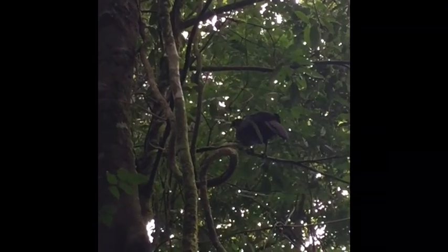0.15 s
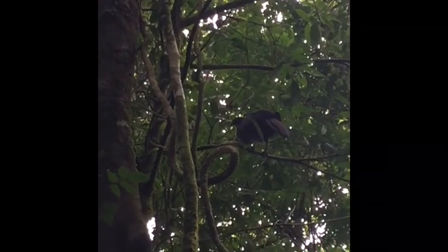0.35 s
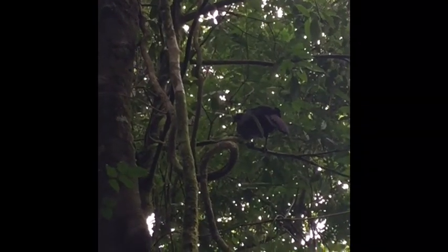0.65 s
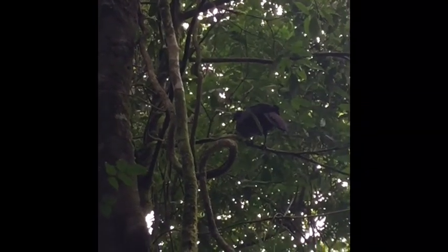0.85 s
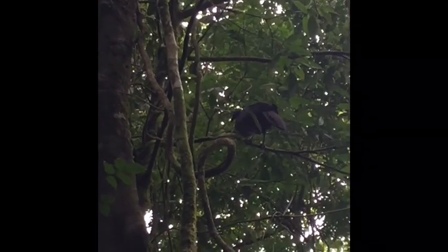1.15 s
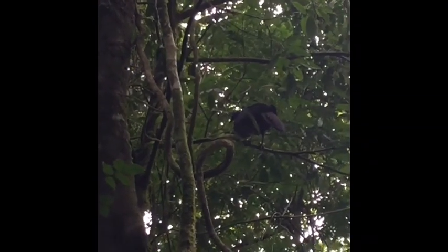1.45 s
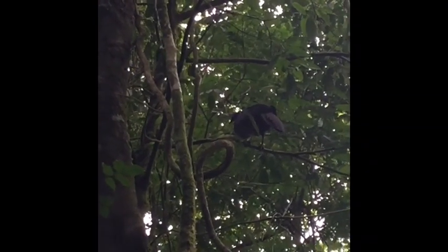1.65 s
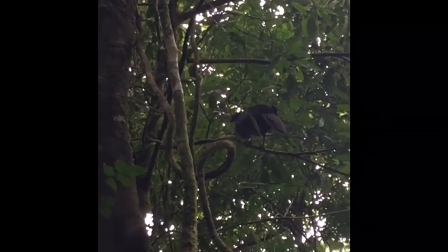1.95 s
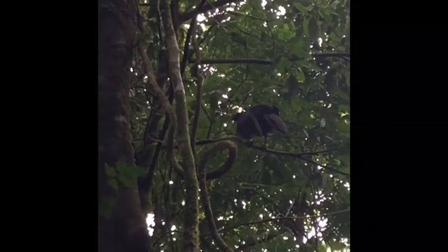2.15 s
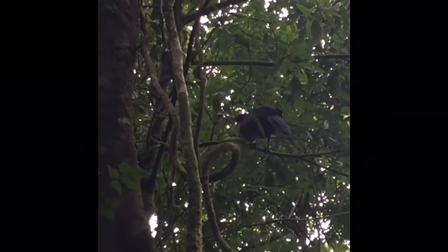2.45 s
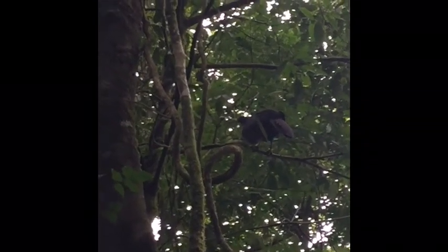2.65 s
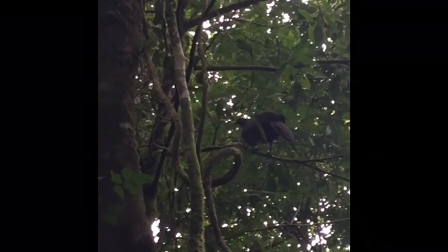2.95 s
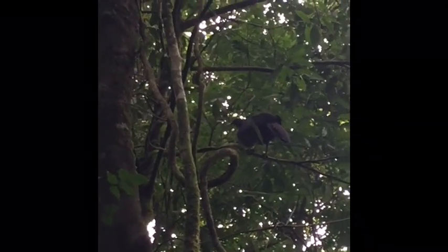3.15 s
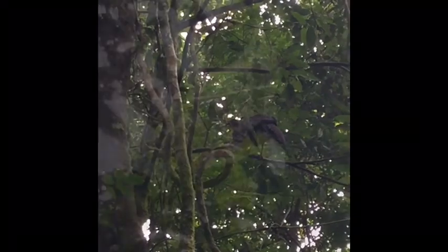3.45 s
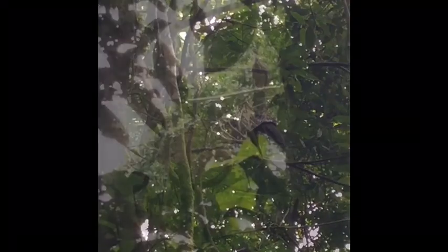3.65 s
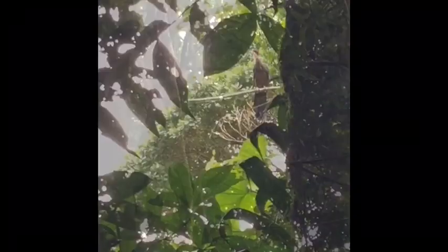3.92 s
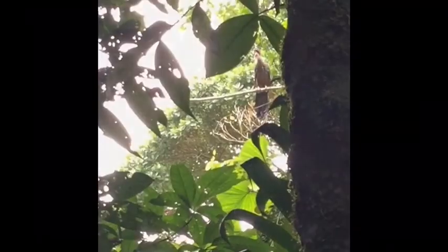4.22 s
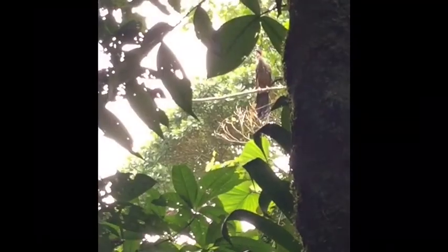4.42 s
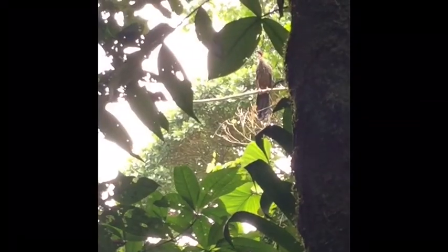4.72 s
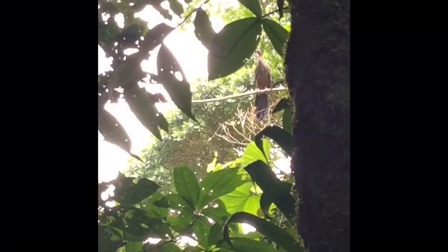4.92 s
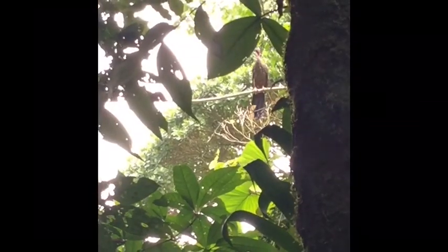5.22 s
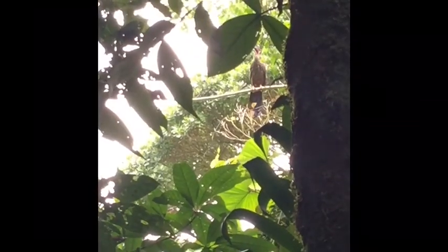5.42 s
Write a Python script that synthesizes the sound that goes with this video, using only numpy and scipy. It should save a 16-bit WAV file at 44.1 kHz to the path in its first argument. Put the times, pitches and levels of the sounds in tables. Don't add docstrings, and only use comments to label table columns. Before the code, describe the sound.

A close cicada sings over a surrounding chorus in shaded rainforest, its dry buzz tightening into a fast, even, bright rattle and sagging in three loud swells. Small leaf brushes and twig ticks sit over a low soft rumble. Near four seconds everything crossfades to a breezier place, where a farther chorus fades almost away and then returns, with a few faint bird whistles. Mono, small recorder with thin bass.

```python
import sys
import numpy as np
from scipy import signal
from scipy.fft import rfft, irfft, next_fast_len
from scipy.io import wavfile
from scipy.ndimage import uniform_filter1d

SR = 44100
rng = np.random.default_rng(int(sys.argv[2]) if len(sys.argv) > 2 else 0)


def voltage_ratio(level):
    return 10 ** (np.asarray(level, float) / 20)


def master_out(mix):
    frames = np.transpose(np.atleast_2d(mix))
    ceiling = np.clip(frames, -1, 1)
    pcm = np.round(ceiling * 32767).astype(np.int16)
    wavfile.write(sys.argv[1], SR, pcm)


N = 246059
TIME = np.arange(N) / SR

# (start [s], turns even [s], peak [dB], even rate [Hz], sag [Hz/s])
PHRASES = [
    (-1.1, -.55, -27, 133, 11),
    (.9, 1.45, -24.7, 133.5, 12),
    (2.84, 3.36, -25.6, 133.2, 9.8),
]
# (time [s], level [dB])
CHORUS = [(0, -35), (.34, -35), (.6, -36.5), (.8, -45.5), (.9, -46.5), (1.5, -38), (2.32, -35),
          (2.53, -30.5), (2.64, -36), (2.86, -38.5), (4.05, -44), (4.64, -48.5), (4.88, -58.5), (5.12, -56),
          (5.47, -41.5), (5.58, -43)]
DISSOLVE_S, CROSS_S = (3.9, 4.25), (3.42, 4.2)


def unit(x):
    return x / np.sqrt(np.mean(x ** 2))


def curves(table):
    s, *columns = np.transpose(table)
    return [np.interp(TIME, s, c) for c in columns]


def colour(x, points):
    hz, db = np.transpose(points)
    size = next_fast_len(len(x))
    log_hz = np.log(np.arange(size // 2 + 1) * SR / size + 1)
    gain = voltage_ratio(np.interp(log_hz, np.log(hz), db))
    return unit(irfft(rfft(x, size) * gain, size)[:len(x)])


def walk(rate_hz):
    k = int(SR / rate_hz)
    held = np.repeat(rng.standard_normal(N // k + 1), k)
    return 0.89 * uniform_filter1d(uniform_filter1d(held, k), k)[:N]


def trunks(x, t60_s, wet_db):
    t = TIME[:SR // 2]
    scatter = rng.standard_normal(len(t)) * voltage_ratio(-60 * t / t60_s)
    scatter *= voltage_ratio(wet_db) / np.sqrt(np.sum(scatter ** 2))
    return unit(x + signal.fftconvolve(x, scatter)[:N])


def near_singer():
    attack_s, build_db, built_db, step_s = .13, -5, -3.8, .07
    hold_s, tire_s, tired_db, stop_s, silent_db = .5, .27, -5, .12, -24
    rest_hz, rush_hz, rush_drop_s, steady_s = 128.5, 136.5, .06, .08
    even_peak, even_in_s, even_s, even_out_s, even_rest = .92, .15, .46, .2, .12
    dark_start_db, shell_build_db = -14, -5
    db, lift_db = np.full(N, -120.), np.zeros(N)
    hz, even = np.full(N, 1. * rest_hz), np.full(N, 1. * even_rest)
    for start, turn, peak_db, even_hz, sag in PHRASES:
        on = TIME >= start
        tired = turn + hold_s + tire_s
        times = (start, start + attack_s, turn - step_s, turn + step_s,
                 turn + hold_s, tired, tired + stop_s, tired + 3 * stop_s)
        shape_db = (silent_db, build_db, built_db, 0, 0, tired_db, silent_db, 3 * silent_db)
        db = np.where(on, peak_db + np.interp(TIME, times, shape_db), db)

        times = (start, start + 1.5 * attack_s, turn)
        lift_db = np.where(on, np.interp(TIME, times, (dark_start_db, shell_build_db, 0)), lift_db)

        rush = np.interp(TIME, (start, turn - rush_drop_s, turn), (rest_hz, rush_hz, even_hz))
        sagging = np.maximum(even_hz - sag * np.maximum(TIME - turn - steady_s, 0), rest_hz - 1)
        hz = np.where(on, np.where(TIME < turn, rush, sagging), hz)

        times = (turn - even_in_s, turn + .02, turn + even_s, turn + even_s + even_out_s)
        even = np.where(on, np.interp(TIME, times, (even_rest, even_peak, even_peak, even_rest)), even)
    return db, lift_db, hz, even


def bands(near_db, lift_db):
    # (time [s], level above body [dB])
    chorus_shell = [(4.15, -18), (4.7, -31), (5.45, -33), (5.58, -22)]
    near_overtone_db, near_shell_db = -24, -8
    chorus_overtone_db, far_overtone_db = -30, -24
    dull_below_db, dull_slope = -37.5, 2.4
    chorus_db = curves(CHORUS)[0]
    near = (voltage_ratio(near_db) * np.interp(TIME, CROSS_S, (1, 0))) ** 2
    chorus = voltage_ratio(chorus_db) ** 2
    far = np.interp(TIME, DISSOLVE_S, (0, 1))
    dull_db = chorus_overtone_db + dull_slope * np.minimum(chorus_db - dull_below_db, 0)
    dull_db = (1 - far) * dull_db + far * far_overtone_db

    def mix(a_db, b_db):
        return 10 * np.log10((near * voltage_ratio(2 * a_db) + chorus * voltage_ratio(2 * b_db)) / (near + chorus))

    body_db = 10 * np.log10(near + chorus)
    overtone_db = mix(near_overtone_db + .7 * lift_db, dull_db)
    return body_db, overtone_db, mix(near_shell_db + lift_db, curves(chorus_shell)[0])


def slack():
    rise_s, end_s = .05, .24
    return voltage_ratio(-15) * sum(np.interp(TIME, (s, s + rise_s, s + end_s), (0, 1, 0)) for s, *_ in PHRASES)


def singer(hz, trail, slip_s, scatter_db):
    turns = np.cumsum(hz) / SR
    cycle = np.arange(int(turns[-1]))
    left = np.interp(cycle, turns, np.arange(N))
    right = np.interp(cycle + trail[left.astype(int)], turns, np.arange(N))
    chance = rng.standard_normal((2, 2, 1000))[:, :, :len(left)]
    place = np.clip(np.array([left, right]) + slip_s * SR * chance[0], 8, N - 9).ravel()
    size = (np.array([[1], [-.5]]) * voltage_ratio(scatter_db * chance[1])).ravel()
    taps = np.floor(place)[:, None] + np.arange(-7, 9)
    off = taps - place[:, None]
    shape = np.sinc(off) * np.cos(np.pi * off / 16) ** 2
    return np.bincount(taps.astype(int).ravel(), (size[:, None] * shape).ravel(), N)


def cicadas():
    # (time [s], muscle rate [Hz], share [0-1])
    second_song = [(1.5, 123.5, 0), (1.62, 123.8, 0), (1.72, 123.6, 0.35), (1.9, 121.9, .4),
                   (2.12, 119.6, 0.42), (2.2, 119, 0.16)]
    # (time [s], share of a cycle [0-1])
    trail_course = [(0, .55), (2.4, .55), (2.7, .5), (5.58, .5)]
    # (frequency [Hz], density [dB/Hz])
    even_body = [(1240, -74), (2100, -36), (2450, -20), (2730, -33), (3130, -4), (3320, -4), (3670, 0),
                 (4040, -5.5), (4210, 0.5), (4990, -1.5), (5690, -7), (7000, -31.5), (9100, -74),
                 (15400, -120)]
    ragged_body = [(1240, -66), (2100, -38.5), (2260, -28), (2430, -26), (2970, -6.5), (3340, -6.5),
                   (3600, 0), (3960, -5), (4170, 1), (4540, 2.5), (5170, -6), (5610, -5), (5990, -11.5),
                   (6660, -25.5), (7000, -35.5), (9100, -95), (15400, -120)]
    far_body = [(1470, -39), (2500, -17), (3090, -0.5), (3320, -3.5), (3630, -0.5), (4360, 0.5),
                (5880, -10), (6500, -18.5), (8450, -52), (14300, -120)]
    slack_body = [(2100, -40), (2350, -6), (2550, 0), (2850, -4), (3300, -40)]
    # (frequency [Hz], density [dB/Hz])
    overtone_ring = [(6400, -25), (7300, -7), (8200, -1.5), (9400, -3), (10500, -9), (11300, -13),
                     (13000, -23)]
    # (frequency [Hz], density [dB/Hz])
    hard_shell = [(6470, -69), (11000, -50), (11700, -12), (12200, -2), (13200, 3), (13700, 3.5),
                  (14300, 7.5), (15700, 0.5)]
    soft_shell = [(6470, -51), (11000, -29), (12500, 4.5), (13200, 4), (14100, 6.5), (15700, -4)]

    near_db, lift_db, lead_hz, even = near_singer()
    body_db, overtone_db, shell_db = bands(near_db, lift_db)
    second_hz, share = curves(second_song)
    trail = curves(trail_course)[0] + 0.0046 * walk(5.99)
    even, share = np.clip(even, 0, 1), np.clip(share, 0, 1)
    rest = np.sqrt(np.clip(1 - even ** 2 - share ** 2, 0, 1))

    lead = trunks(singer(lead_hz, trail, 9e-6, 0.8), 0.18, 10.0)
    second = trunks(singer(second_hz, trail, 9e-6, 1.28), 0.11, 7.0)
    ragged = sum(singer(pace * lead_hz, trail, 0.000199, 2.4) for pace in (1, 1.003, .94, .91, 1.05))
    ragged = trunks(ragged, 0.3, 6.2)

    far = np.interp(TIME, DISSOLVE_S, (0, 1))
    buzz = np.sqrt(1 - far) * colour(ragged, ragged_body) + np.sqrt(far) * colour(ragged[::-1], far_body)
    body = even * colour(lead, even_body) + share * colour(second, even_body) + rest * buzz
    body = body + slack() * colour(ragged, slack_body)

    clicks = unit(1.05 * (even * lead + share * second) + (rest + 0.34) * ragged)
    throb = signal.butter(1, (11, 26), "band", fs=SR, output="sos")
    flutter_db = unit(signal.sosfilt(throb, rng.standard_normal(N)))
    overtone = colour(clicks, overtone_ring) * voltage_ratio(overtone_db + 0.71 * flutter_db)
    effort = np.clip((body_db + shell_db + 45) / 9, 0, 1)
    shell = effort * colour(clicks, hard_shell) + (1 - effort) * colour(clicks, soft_shell)
    shell = shell * voltage_ratio(shell_db + 0.83 * flutter_db)

    body = body * voltage_ratio(0.76 * flutter_db + .5 * walk(60))
    treble = (overtone + shell) * voltage_ratio(1.6 * walk(9))
    return voltage_ratio(body_db) * (body + treble)


def air(points, flicker_db):
    out, gust, size = 0, walk(1.338), next_fast_len(N)
    noise = rfft(rng.standard_normal(size))
    octaves = np.log2(np.arange(size // 2 + 1) * SR / size + 1)
    for octave in np.arange(5, 14.5, .5):
        window = np.cos(np.pi * np.clip(octaves - octave, -.5, .5)) ** 2
        band = irfft(noise * window, size)[:N]
        depth_db = flicker_db * min(1, 400 / 2 ** octave) ** 0.2
        out = out + band * voltage_ratio(0.26 * gust + depth_db * walk(16))
    return colour(out, points)


def shade():
    # (frequency [Hz], density [dB/Hz])
    shade_spectrum = [(30, -53), (60, -52), (120, -17), (220, 0), (350, -6), (600, -11.5), (1200, -14),
                      (2000, -19), (5000, -37), (7200, -50), (11500, -59), (15000, -60)]
    hush_hz, hush_below_db, hush_slope = 1500, -39, 1.2
    sound = air(shade_spectrum, 4.0)
    top = signal.sosfiltfilt(signal.butter(2, hush_hz, "high", fs=SR, output="sos"), sound)
    hush_db = hush_slope * np.minimum(curves(CHORUS)[0] - hush_below_db, 0)
    return voltage_ratio(-58.5) * (sound - top * (1 - voltage_ratio(hush_db)))


def rustles():
    # (time [s], peak [dB], centre [Hz], width [Hz], length [s])
    brushes = [(0.157, -57.5, 297, 200, 0.028), (0.222, -54.5, 222, 153, 0.028),
               (0.278, -53, 288, 200, 0.031), (1.497, -42, 2200, 2100, 0.009),
               (1.573, -53, 200, 150, 0.016), (1.67, -52, 380, 300, 0.0097),
               (1.863, -49.5, 453, 601, 0.009), (1.947, -55.5, 397, 905, 0.047),
               (2.008, -47.5, 632, 456, 0.042), (2.012, -46, 1400, 2200, 0.036),
               (2.232, -48.5, 320, 401, 0.034), (2.235, -50.5, 1000, 2200, 0.03),
               (2.26, -60, 79.7, 78.3, 0.014), (2.591, -57, 909, 1500, 0.061),
               (2.764, -53, 240.4, 200.8, 0.018), (2.853, -56.5, 1200, 1020, 0.011),
               (3.199, -58, 270, 200, .015), (3.44, -50, 297.5, 402, 0.02),
               (3.441, -56.5, 1000, 910, 0.013), (3.64, -61.5, 690, 400, 0.058),
               (3.76, -56, 496, 900, 0.026)]
    out, size = np.zeros(N), 8192
    hz = np.arange(size // 2 + 1) * SR / size
    for s, db, centre_hz, width_hz, length_s in brushes:
        grain_db = 2.4 * rng.standard_normal(64).repeat(128)
        noise = rng.standard_normal(size) * voltage_ratio(grain_db)
        response = hz ** 2 / (hz ** 2 + 150 ** 2) / (1 + (2 * (hz - centre_hz) / width_hz) ** 4)
        band = unit(irfft(rfft(noise) * response))
        u = TIME[:size] / length_s
        burst = unit(band * u * np.exp(-2 * u ** 2)) * np.sqrt(length_s * SR / size)
        i = int(s * SR)
        out[i:i + size] += voltage_ratio(db) * burst
    return out


def breeze():
    # (frequency [Hz], density [dB/Hz])
    breeze_spectrum = [(30, -50), (60, -52), (120, -6.5), (250, 0), (500, -7.5), (1000, -9), (2200, -9),
                       (4000, -7), (7000, -19), (11000, -29.5), (15000, -47)]
    return voltage_ratio(-49) * air(breeze_spectrum, 4.0)


def birds():
    # (time [s], length [s], start [Hz], end [Hz], level [dB])
    whistles = [
        (3.69, 0.047, 2180, 1720, -60),
        (3.735, 0.029, 1550, 1450, -57),
        (3.765, 0.04, 1370, 1330, -56),
        (4.38, 0.062, 1354, 1275, -47),
        (4.45, .035, 1255, 1200, -54),
        (4.94, .11, 5550, 5620, -55),
    ]
    out = np.zeros(N)
    for s, length_s, start_hz, end_hz, db in whistles:
        u = np.clip((TIME - s) / length_s, 0, 1)
        phase = 2 * np.pi * np.cumsum(start_hz + (end_hz - start_hz) * u) / SR
        out += voltage_ratio(db) * np.sin(np.pi * u) * np.sin(phase)
    return np.sqrt(np.mean(out ** 2)) * trunks(out, .15, -3.5)


def scene():
    cross = np.interp(TIME, CROSS_S, (0, 1))
    background = (1 - cross) * shade() + cross * breeze()
    return (cicadas() + background + rustles() + birds())[None]


def band_limit(x):
    return signal.sosfilt(signal.butter(12, 16290, fs=SR, output="sos"), x)


def record(dry):
    thin = signal.sosfilt(signal.butter(1, 55, "high", fs=SR, output="sos"), dry)
    cut = signal.sosfilt(signal.ellip(10, .2, 80, 15730, fs=SR, output="sos"), thin)
    return band_limit(cut)


dry = scene()
out = record(dry)
master_out(out)
```